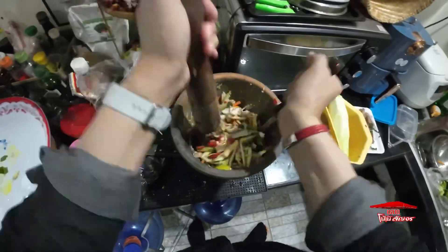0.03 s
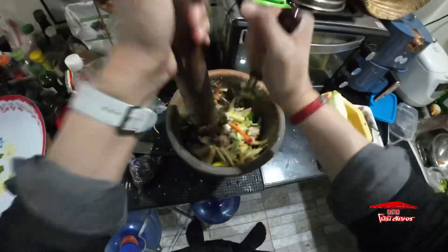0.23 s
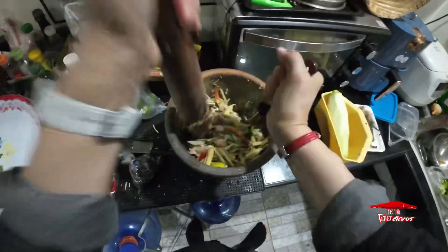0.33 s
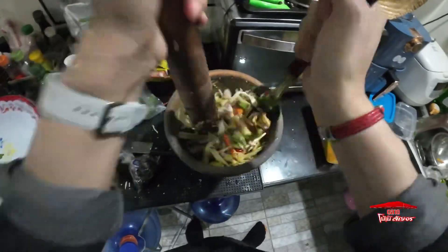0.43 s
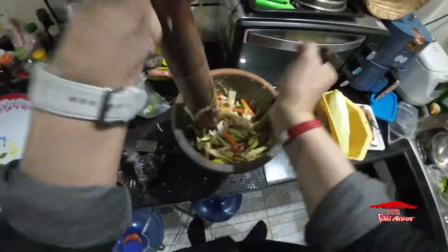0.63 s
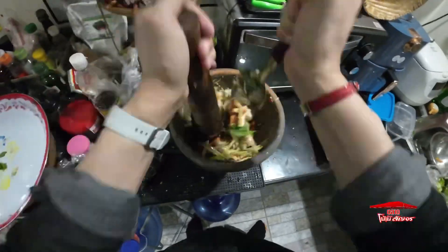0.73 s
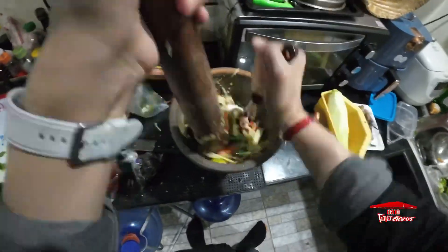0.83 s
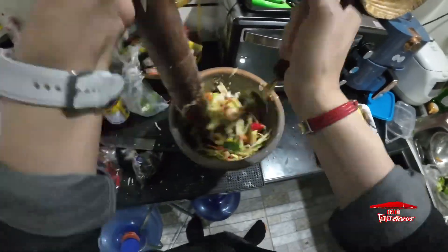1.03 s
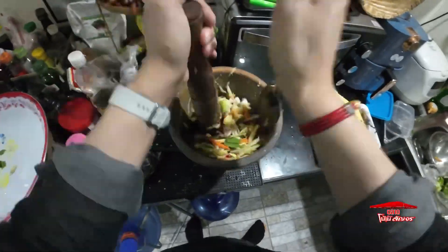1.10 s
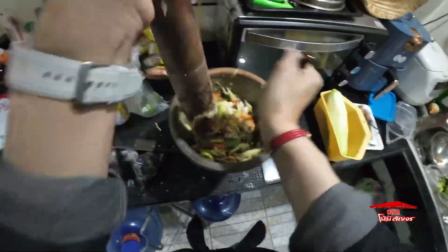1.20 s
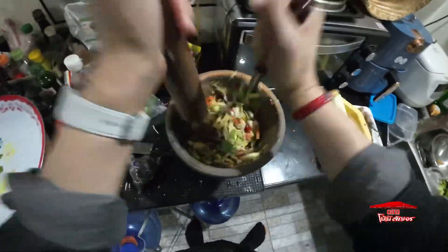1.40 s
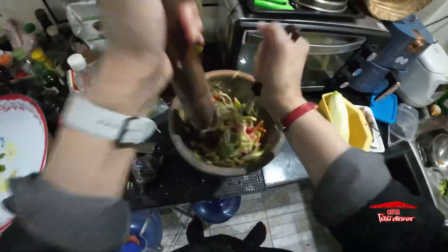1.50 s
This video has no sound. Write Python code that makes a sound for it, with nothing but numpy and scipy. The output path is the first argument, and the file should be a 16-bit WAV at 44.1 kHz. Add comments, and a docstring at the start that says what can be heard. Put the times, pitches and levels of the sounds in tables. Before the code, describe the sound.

A wooden pestle pounds wet salad in a clay mortar close by, thudding with a brief ring at about 0.2, 0.4, 0.8 and 1.1 seconds. A spoon scrapes with a tiny squeak near 0.3, clacks sharply against the wall at 0.5, and taps lightly at 1.2 and 1.5. Between blows the shreds squelch and crackle, while the kitchen counter bumps softly underneath.

```python
"""Pounding salad in a clay mortar

Close by, a wooden pestle thuds through shredded salad and sets the clay bowl ringing.
A spoon scrapes and squeaks along the wall, clacks hard against it once and taps it lightly later.
The wet shreds squelch and pop between the blows, and the kitchen counter bumps softly underneath."""
import sys
import numpy as np
from scipy import signal
from scipy.fft import rfft, irfft, next_fast_len
from scipy.io import wavfile
from scipy.ndimage import uniform_filter1d

SR = 44100
rng = np.random.default_rng(int(sys.argv[2]) if len(sys.argv) > 2 else 0)


def generate_wav(sig):
    """Save sig (samples, or channels by samples) to the path in sys.argv[1] as 16-bit PCM at SR."""
    pcm = np.round(np.clip(np.atleast_2d(sig).T, -1, 1) * 32767).astype(np.int16)
    wavfile.write(sys.argv[1], SR, pcm)


N = 68355
T = np.arange(N) / SR

# Pestle blows. Each row: start in seconds, ring in dB, rise in seconds, brightness in Hz,
# thud in dB, knock in dB, wet slap in dB.
PESTLE_BLOWS = [(.187, -17, .022, 580, -39, -55, -46), (.391, -17, 0.002, 1130, -30.5, -13, -28),
                (.7725, -20.5, 0.0027, 700, -23.5, -39, -49),
                (1.0995, -16, 0.0049, 1790, -23.5, -35.5, -22)]
# The spoon hits the wall. Each row: start in seconds, crack in dB, ring in dB.
SPOON_CLACKS = [(.5103, -13.5, -12.5), (0.5161, -14.5, -15), (0.857, -59, -43.5), (1.2215, -32, -36),
                (1.4917, -34.5, -36)]
# Scrapes. Each row: start and length in seconds, rasp in dB, ring in dB, lowest pitch in Hz.
SPOON_SCRAPES = [(0.2893, 0.0057, -34.5, -32.5, 2580), (0.302, 0.0076, -38, -54, 2600),
                 (0.328, 0.017, -22, -45, 537), (0.551, 0.0049, -35.5, -35, 2500),
                 (0.592, 0.01, -35.5, -45, 1420), (1.128, 0.016, -45, -27.5, 1450),
                 (1.154, 0.013, -46, -43, 1860)]
# Squeaks. Each row: start and length in seconds, first and last pitch in Hz, level in dB,
# dB of the octave compared with the main tone.
SPOON_SQUEAKS = [(0.291, 0.002, 2662, 2690, -37.5, 12), (0.296, 0.016, 2760, 3150, -31, -17),
                 (0.328, 0.0131, 2282, 2633, -27.5, -13.5)]
# Popping shreds. Each row: start and length in seconds, level in dB, lowest and highest pitch in Hz.
WET_POPS = [(.025, 0.0054, -31.5, 404, 1950), (.215, 0.0031, -28, 254, 726), (0.412, .003, -41, 5960, 9300),
            (0.63, 0.017, -39.5, 1100, 2360), (0.803, 0.012, -45.5, 3530, 6100),
            (.846, 0.0059, -38, 230, 650), (0.8812, 0.0018, -33.5, 9230, 11900),
            (0.898, 0.014, -38, 1050, 1590), (0.9195, .001, -42, 3500, 8000),
            (0.955, 0.017, -34.5, 500, 1550), (1.137, 0.012, -34.5, 150, 1200),
            (1.2222, 0.0011, -32, 1970, 2740), (1.443, .001, -47.5, 7030, 12000),
            (1.462, 0.00071, -36.5, 6000, 12100), (1.4678, 0.0018, -39, 1010, 4000),
            (1.479, .001, -39.5, 4930, 12000), (1.4913, 0.0023, -31, 640, 1480),
            (1.519, 0.007, -36, 510, 1300)]
# Bumps of the counter. Each row: start in seconds, level in dB.
COUNTER_BUMPS = [(0.029, -30), (0.191, -29.5), (0.396, -21.5), (.57, -30), (0.771, -31.5), (1.104, -28),
                 (1.136, -28), (1.328, -27), (1.522, -35.5)]

# Ringing tones. Each row: pitch in Hz, level in dB, seconds to fade by 60 dB (called t60).
BOWL_TONES = [(638, 0, .18), (1530, -1, .06), (1571, -2, .085), (2867, 0, .075), (3185, -9, .08),
              (3464, -10, .075), (4054, -11, .08), (4419, -8, .08), (4968, -10, .075), (5702, -10, .075),
              (6175, -1, .05), (6318, -7, .06)]  # the clay bowl
ROCKING_TONES = [(124, -24.5, 0.14), (162, -22, 0.24), (524.7, -12.5, 0.15), (605, -11, 0.22),
                 (820, -8.5, 0.12), (836, -9, 0.064), (898, -10.5, 0.2), (933, -19.5, 0.27),
                 (1140, -16.5, 0.15), (1330, -15, .12)]  # the mortar rocking on the counter

# Loudness over time. Each row: time in seconds, level in dB.
MASH_LEVELS = [(0, -41), (.05, -38), (.10, -55), (.175, -67), (.23, -43.5), (.28, -55), (.32, -45.5),
               (.43, -60), (.49, -55), (.59, -43.5), (.645, -45), (.68, -57), (.76, -68), (.81, -34.5),
               (.875, -54.5), (.91, -43.5), (.97, -42.5), (1.0, -50.5), (1.09, -74), (1.14, -32),
               (1.21, -45.5), (1.285, -57.5), (1.34, -44.5), (1.42, -71), (1.505, -35.5), (1.55, -58)]  # squelching mash
JUICE_LEVELS = [(0, -41.5), (.03, -42.5), (.09, -61), (.18, -70), (.22, -49), (.28, -56), (.36, -42),
                (.385, -80), (.415, -46.5), (.49, -69), (.53, -40.5), (.605, -40), (.655, -46.5),
                (.68, -64.5), (.76, -63), (.81, -40.5), (.835, -57.5), (.865, -45), (.92, -47.5),
                (.97, -49), (1.0, -61.5), (1.095, -66), (1.14, -40), (1.18, -39), (1.27, -61),
                (1.33, -46.5), (1.41, -71), (1.44, -62.5), (1.49, -39.5), (1.55, -63)]  # crackling juice

# Tone colours: how strong the lows and highs are. Each row: frequency in Hz, level in dB.
THUD_COLOUR = [(100, -13.5), (230, -30), (340, -6), (520, 5), (800, -6), (1500, -21), (3000, -36),
               (12000, -44.5)]  # pestle cushioned by food
SLAP_COLOUR = [(300, -1.5), (800, 0), (1600, 1), (2200, -16), (3300, 0), (4400, -31), (6300, -28),
               (12000, -46)]  # pestle slapping wet shreds
KNOCK_COLOUR = [(120, -12), (230, -12), (320, 4.5), (430, -17), (540, 4), (740, -0.5), (900, 4.5),
                (1100, -7.5), (1650, 1), (2300, -21), (4400, -21.5), (5150, -14), (6200, -32),
                (11000, -27.5), (16000, -50)]  # pestle reaching the clay
CRACK_COLOUR = [(150, -39), (350, -1.5), (520, 5.5), (820, -10.5), (1100, -1.5), (2500, 2.5), (6300, -2),
                (7300, -9), (9000, -14.5), (11000, -4.5), (13000, -22), (16000, -27)]  # spoon striking the wall
RASP_COLOUR = [(500, 3.5), (900, 1), (1450, 8), (2000, -4.5), (3000, -7.5), (5500, -6.5), (8000, -14),
               (10800, -8), (13500, -24.5), (15500, -25)]  # spoon scraping the wall
MASH_COLOUR = [(150, -21), (350, -13), (540, 4), (850, -3), (1300, -2), (1800, -8), (2800, -27.5),
               (5000, -31)]  # squelching mash
JUICE_COLOUR = [(1200, -1.5), (2300, 8.5), (3500, 5), (5700, 3.5), (7500, 0), (9000, -3.5), (11000, 0.5),
                (12200, -4.5), (13500, -36), (15500, -9.5)]  # crackling juice
BACKGROUND_COLOUR = [(20, -5.5), (40, -6), (65, -5), (110, -16.5), (220, -27.5), (600, -29.5), (1500, -59),
                     (5000, -47.5), (11000, -56.5), (16000, -66)]  # steady low noise
CONTACT_WIDTH = [(100, -21), (300, -29), (650, -29.5), (1400, -21), (2800, -16), (5600, -14), (9000, -7.5),
                 (16000, -10)]  # stereo spread of pestle and spoon
SCATTER_WIDTH = [(300, -29), (1500, -45), (4500, -20), (6500, -9), (9000, -6), (16000, -3)]  # sound from all around the bowl

THUD_T60_S, SLAP_T60_S, KNOCK_T60_S, CRACK_T60_S, POP_T60_S = 0.048, 0.091, 0.015, 0.036, 0.026
RATTLE_DB, RATTLE_T60_S = -6, 0.094  # the struck mortar rattles on
SMOTHER_AFTER_S, SMOTHER_T60_S = 0.065, 0.12  # food pressed on the wall smothers the ring
SLIPS_PER_S, MASH_GRAINS_PER_S, JUICE_GRAINS_PER_S = 2000, 1600, 4000
BUMP_HZ, BUMP_RISE_S, BUMP_T60_S = 63.5, 0.0106, 0.17
ROOM_DB, ROOM_SIDE_DB, ROOM_T60_S = -22.5, -33.5, 0.21
BACKGROUND_DB, RUMBLE_HZ, CUTOFF_HZ = -48, 23.7, 16000
RUMBLE_LEFT_DB, RUMBLE_RIGHT_DB = -37, -45


def pestle():
    """Food softens most blows to a thud, a slap and a low ring; one that reaches the clay knocks hard."""
    out = 0
    for start, ring_db, rise, bright_hz, thud_db, knock_db, slap_db in PESTLE_BLOWS:
        bowl = ring(BOWL_TONES, start, rise, lambda hz: 1 / np.sqrt(1 + (hz / bright_hz) ** 6))
        thud = amp(thud_db) * even_noise(THUD_COLOUR) * envelope(start, rise, THUD_T60_S)
        slap = amp(slap_db) * even_noise(SLAP_COLOUR) * envelope(start, 0.0015, SLAP_T60_S)
        strike = envelope(start, rise, KNOCK_T60_S, hold=0.0012)
        rattle = amp(RATTLE_DB) * envelope(start, rise, RATTLE_T60_S)
        knock = even_noise(KNOCK_COLOUR) * (strike + rattle)
        rocking = ring(ROCKING_TONES, start, rise)
        blow = amp(ring_db) * bowl + thud + slap + amp(knock_db) * (knock + rocking)
        out += blow * envelope(start, 1 / SR, SMOTHER_T60_S, hold=SMOTHER_AFTER_S)
    return out


def spoon_clacks():
    """The light spoon hits with a crack, rings mostly the high tones, then rests and damps them."""
    out = 0
    for start, crack_db, ring_db in SPOON_CLACKS:
        crack = even_noise(CRACK_COLOUR) * envelope(start, 0.00031, CRACK_T60_S, hold=0.00067)
        bowl = ring(BOWL_TONES, start, 0.00039, lambda hz: 1 / np.sqrt(1 + (1800 / hz) ** 4))
        damping = envelope(start, 1 / SR, t60=0.33)
        out += amp(crack_db) * crack + amp(ring_db) * bowl * damping
    return out


def spoon_scrapes():
    """Quick little slips along the rough wall rasp and keep the bowl ringing."""
    out = 0
    wall = keep_band(ring(BOWL_TONES, start=0, rise=0.00023), 3300, "low")
    for start, length, rasp_db, ring_db, low_hz in SPOON_SCRAPES:
        slips = grains(SLIPS_PER_S, spread_db=2.0)
        stroke = envelope(start, 0.00035, t60=0.033, hold=length)
        rasp = unit(keep_band(colour(slips, RASP_COLOUR), low_hz, "high", order=4))
        slip_ring = keep_band(wall, low_hz, "high", order=5)
        bowl = signal.fftconvolve(slips * stroke, slip_ring / np.linalg.norm(slip_ring))[:N]
        out += amp(rasp_db) * rasp * stroke + amp(ring_db) * bowl
    return out


def spoon_squeaks():
    """The spoon sticks and slips, making a rough rising tone and its octave."""
    out = 0
    for start, length, first_hz, last_hz, db, octave_db in SPOON_SQUEAKS:
        glide_hz = np.interp(T, [start, start + length], [first_hz, last_hz])
        hz = glide_hz * (1 + 0.049 * wobble(per_s=1500))
        phase = 2 * np.pi * np.cumsum(hz) / SR
        tone = np.sin(phase) + amp(octave_db) * np.sin(2 * phase)
        out += amp(db) * tone * envelope(start, 0.0023, t60=0.014, hold=length)
    return out


def wet_salad():
    """Small wet pockets close in the mash and ring briefly, under a fine crackle of juice."""
    pockets = 0
    for hz in np.geomspace(300, 3000, num=16):
        b, a = signal.iirpeak(hz, Q=7.0, fs=SR)
        closings = grains(MASH_GRAINS_PER_S / 16, spread_db=1.0) + 1e-18
        pockets += unit(signal.lfilter(b, a, closings)) * np.sqrt(hz)
    hiss = amp(-13.5) * rng.standard_normal(N)
    mash = unit(colour(unit(pockets) + hiss, MASH_COLOUR))
    crackle = grains(JUICE_GRAINS_PER_S, spread_db=2.5)
    clumps = unit(amp(2.5 * wobble(per_s=95)))  # the crackle comes in small bunches
    juice = unit(colour(crackle * clumps, JUICE_COLOUR))
    mash_db = np.interp(T, *np.transpose(MASH_LEVELS))
    juice_db = np.interp(T, *np.transpose(JUICE_LEVELS))
    return amp(mash_db) * mash + amp(juice_db) * juice


def wet_pops():
    """Single shreds squish or snap, each a short burst of low or high noise."""
    out = 0
    for start, length, db, low_hz, high_hz in WET_POPS:
        fizz = unit(keep_band(rng.standard_normal(N), [low_hz, high_hz], "band"))
        out += amp(db) * fizz * envelope(start, 0.00031, POP_T60_S, hold=length)
    return out


def counter():
    """Each push sways the counter for a few slow swings."""
    out = 0
    for start, db in COUNTER_BUMPS:
        sway = np.sin(2 * np.pi * BUMP_HZ * (T - start))
        out += amp(db) * sway * envelope(start, BUMP_RISE_S, BUMP_T60_S)
    return out


def kitchen_echo(x):
    """The room answers with a short spray of fading echoes, without bass."""
    echoes = rng.standard_normal(N) * envelope(start=0.018, rise=0.006, t60=ROOM_T60_S)
    tail = signal.fftconvolve(x, echoes / np.linalg.norm(echoes))[:N]
    return keep_band(tail, 600, "high")


def background():
    """A faint, steady, low noise."""
    return amp(BACKGROUND_DB) * unit(colour(rng.standard_normal(N), BACKGROUND_COLOUR))


def rumble():
    """A very deep rumble, stronger on the left."""
    noise = unit(keep_band(rng.standard_normal((2, N)), RUMBLE_HZ, "low"))
    return amp([[RUMBLE_LEFT_DB], [RUMBLE_RIGHT_DB]]) * noise


def ring(tones, start, rise, weight=lambda hz: 1):
    """Fading tones after one hit; weight says how strongly the hit wakes each pitch."""
    out = 0
    for hz, db, t60 in tones:
        tone = np.sin(2 * np.pi * (hz * (T - start) + rng.random()))
        out += amp(db) * weight(hz) * envelope(start, rise, t60) * tone
    return out


def envelope(start, rise, t60, hold=0):
    """Loudness that climbs, holds, then fades by 60 dB every t60 seconds."""
    t = T - start
    return np.clip(t / rise, 0, 1) * amp(-60 * np.maximum(t - rise - hold, 0) / t60)


def even_noise(points):
    """Coloured noise held at a steady level, like many close tones ringing together."""
    x = colour(rng.standard_normal(N), points)
    return x / np.sqrt(uniform_filter1d(x ** 2, size=256) + 1e-12)


def grains(per_s, spread_db):
    """Random clicks of uneven size."""
    sizes = amp(spread_db * np.minimum(rng.exponential(1, N), 4))
    signs = rng.choice([-1, 1], N)
    return unit(sizes * signs * (rng.random(N) < per_s / SR))


def wobble(per_s):
    """Random values joined by straight lines."""
    return np.interp(T * per_s, np.arange(N), rng.standard_normal(N))


def colour(x, points):
    """Give a sound a tone colour."""
    size = 2 * next_fast_len(N)
    cepstrum = irfft(np.log(curve_gains(points, size)))
    # Fold the filter forward in time so nothing sounds early (minimum phase).
    cepstrum[1:size // 2] *= 2
    cepstrum[size // 2 + 1:] = 0
    return irfft(rfft(x, size) * np.exp(rfft(cepstrum)))[..., :N]


def curve_gains(points, size):
    """Turn rows of Hz and dB into a gain for each frequency in a sound of size samples."""
    hz, db = np.transpose(points)
    log_hz = np.log(np.fft.rfftfreq(size, 1 / SR) + 1)
    return amp(np.interp(log_hz, np.log(hz), db))


def keep_band(x, hz, kind, order=2):
    """Let the lows, the highs or a band between them through."""
    return signal.sosfilt(signal.butter(order, hz, kind, fs=SR, output="sos"), x)


def amp(db):
    """Turn decibels into a number to multiply by."""
    return 10 ** (np.asarray(db) / 20)


def unit(x):
    """Scale to an average (rms) level of 1."""
    return x / np.sqrt(np.mean(x ** 2) + 1e-20)


def scene():
    """The mortar sits in the middle; a side signal spreads its sounds to the left and right."""
    contacts = pestle() + spoon_clacks() + spoon_scrapes() + spoon_squeaks()
    near = contacts + wet_salad() + wet_pops()
    middle = near + amp(ROOM_DB) * kitchen_echo(near) + counter() + background()
    # A quarter-cycle shift (1j) widens the sound without pulling it to one side.
    spread = irfft(1j * rfft(contacts) * curve_gains(CONTACT_WIDTH, N), N)
    scatter = colour(wet_salad() + spoon_scrapes() + spoon_clacks() + wet_pops(), SCATTER_WIDTH)
    side = spread + scatter + amp(ROOM_SIDE_DB) * kitchen_echo(contacts)
    return np.array([middle + side, middle - side]) + rumble()


def record(dry):
    """Round off the loudest peaks and cut the very highest treble."""
    rounded = 0.9 * np.tanh(dry / 0.9)
    return signal.sosfilt(signal.ellip(10, 0.2, 90, CUTOFF_HZ, fs=SR, output="sos"), rounded)


dry = scene()
out = record(dry)
generate_wav(out)
```